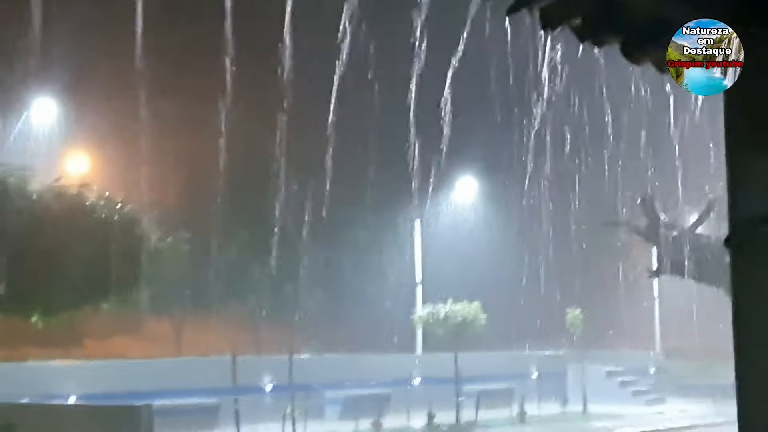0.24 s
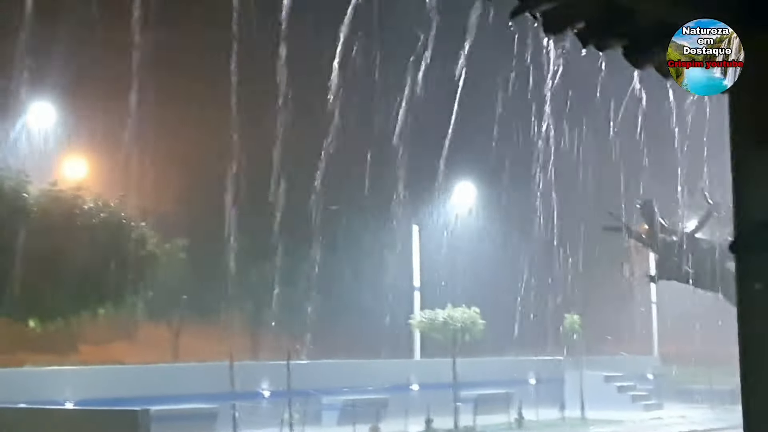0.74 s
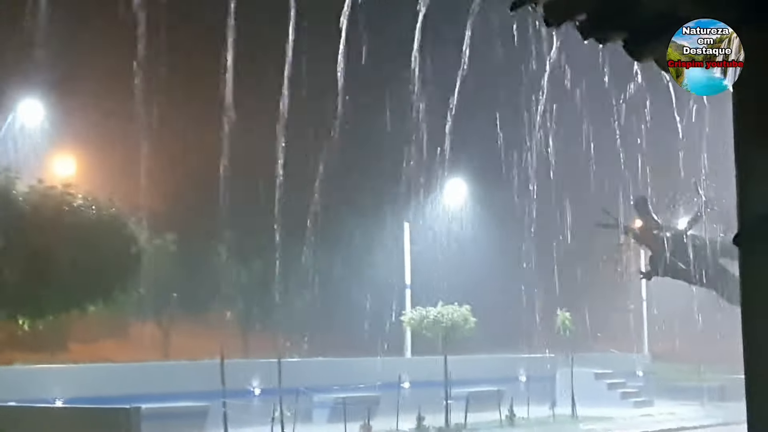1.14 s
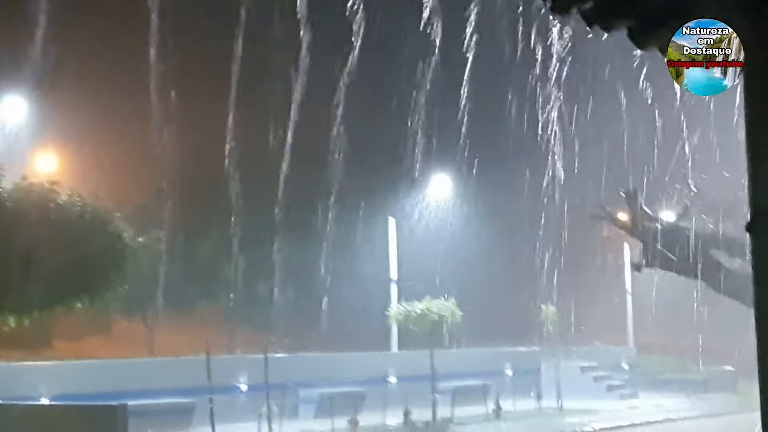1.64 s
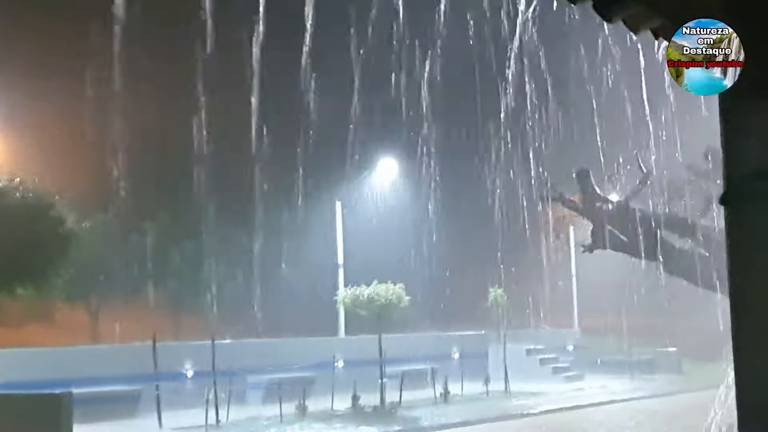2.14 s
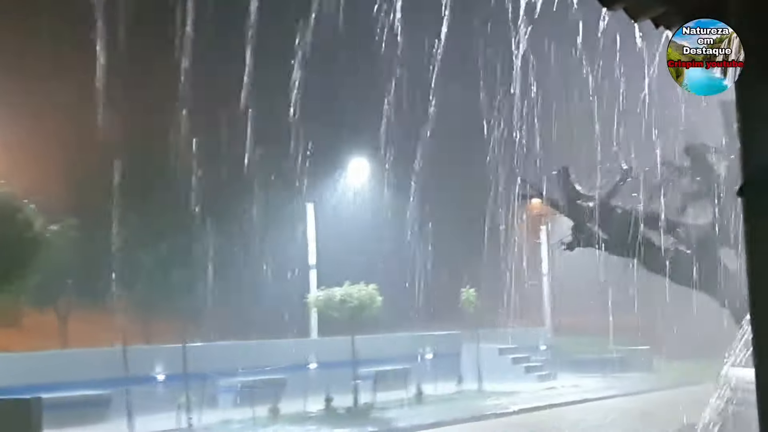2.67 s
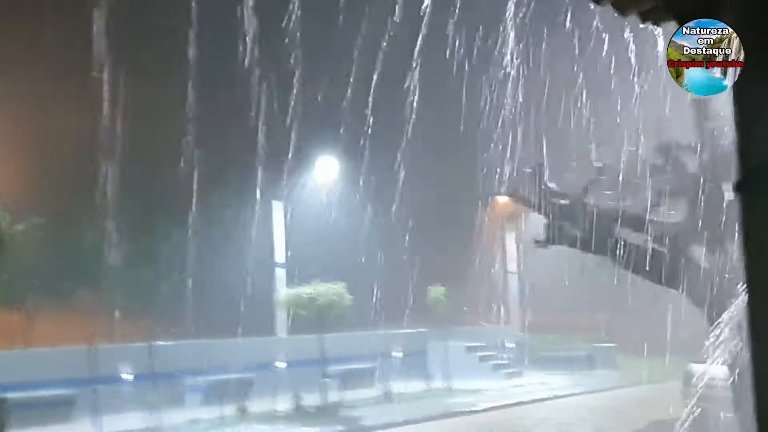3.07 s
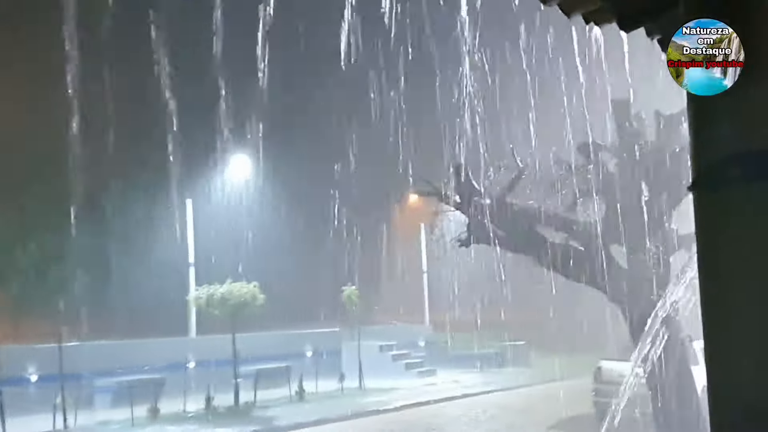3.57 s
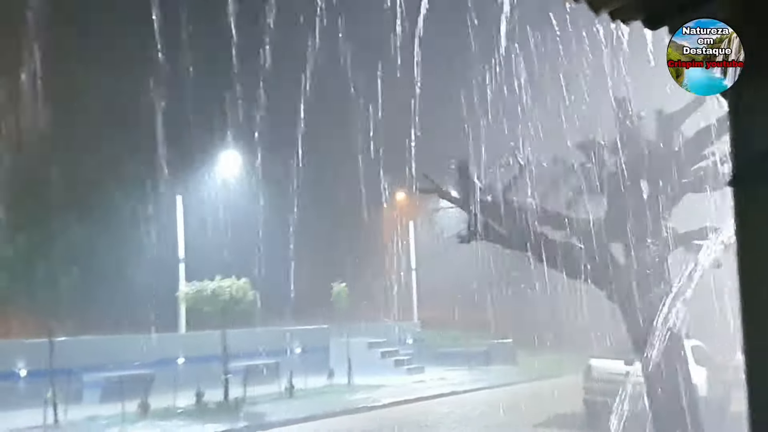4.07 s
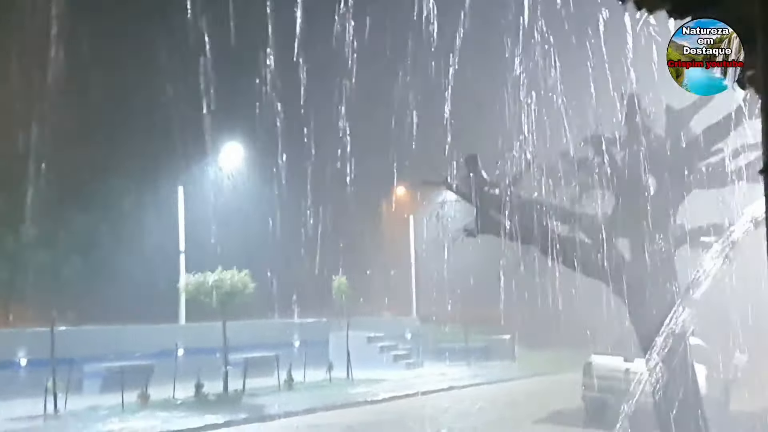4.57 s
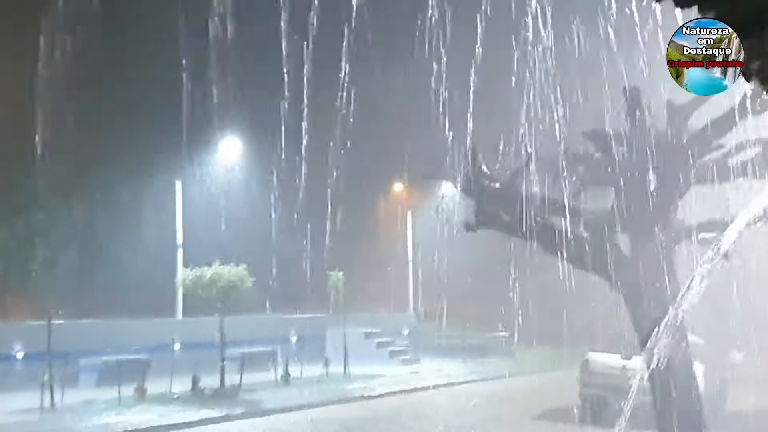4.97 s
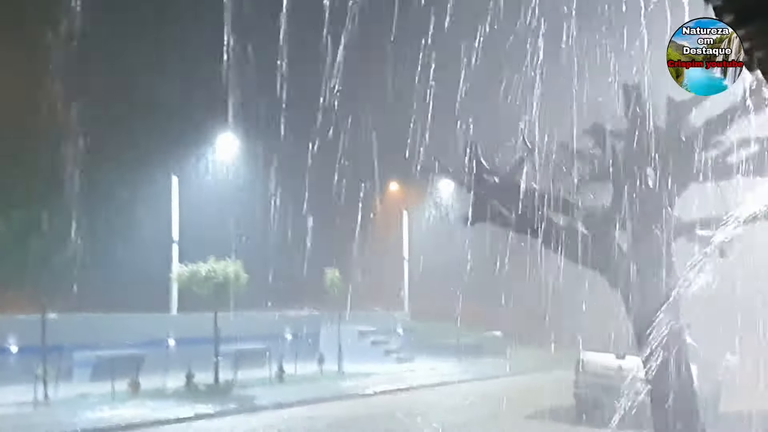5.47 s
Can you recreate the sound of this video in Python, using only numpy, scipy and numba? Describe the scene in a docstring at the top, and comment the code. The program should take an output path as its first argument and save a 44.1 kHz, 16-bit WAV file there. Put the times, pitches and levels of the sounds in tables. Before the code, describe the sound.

A torrential downpour heard from under the eaves: dense crackling run-off nearby, broad rain hiss behind, dull faint roof drumming.

```python
"""A torrential downpour from under the eaves, on a hand-held phone: strands of run-off spatter on the
paving close by, as clumped damped sines, and heavier gushes slap down as quick swarms of them.
Behind, far drops merge into a hiss of flickering noise and the roof drums dully in low noise.
Single drops tick beside the phone, plop into puddles or leave ringing bubbles; something hollow rings
as a few wavering sines. A squall lifts the rain, the run-off grows, and both ease off near the end."""
import sys
import numpy as np
from scipy import signal
from scipy.fft import rfft, irfft
from scipy.io import wavfile
from numba import njit

SR = 44100
rng = np.random.default_rng(int(sys.argv[2]) if len(sys.argv) > 2 else 0)


def dump(signal):
    """Clip the signal to [-1, 1] and save it as 16-bit WAV at the path in sys.argv[1]."""
    limited = np.clip(np.atleast_2d(signal).T, -1, 1)
    pcm = np.round(limited * 32767).astype(np.int16)
    wavfile.write(sys.argv[1], SR, pcm)


N = 252252
T = np.arange(N) / SR
BINS_HZ = np.maximum(np.arange(N // 2 + 1) * SR / N, 1)
PORT_LAG_S = 0.00041  # travel time of sound from one microphone port to the other


def undb(db):
    """Decibels to gain."""
    return 10 ** (np.asarray(db) / 20)


def unit(x):
    """Scale to an rms of 1."""
    return x / np.sqrt(np.mean(x ** 2))


def colour(x, points):
    """Filter by a (f/Hz, level/dB) table, interpolated over log frequency."""
    hz, db = np.transpose(points)
    gain = undb(np.interp(np.log(BINS_HZ), np.log(hz), db))
    return irfft(rfft(x) * gain, N)


def walk(rate):
    """Smooth chance that turns about rate times a second; spread near 1."""
    return 1.34 * np.interp(T * rate, np.arange(2048), rng.standard_normal(2048))


def ramp(start_s, length_s):
    """Rises from 0 to 1 and stays there."""
    return np.clip((T - start_s) / length_s, 0, 1)


def weather():
    """Relative gains of open rain and run-off: a squall lifts the rain, which relaxes as the roof fills."""
    squall_s, attack_s, release_s = 0.45, 0.15, 1.47
    rain_db, squall_db = -28.5, 2  # steady level, and what the squall adds
    runoff_db, swell_db, swell_db_per_s = -30, 1.5, 0.49  # level at first, its step, its further growth
    squall = ramp(squall_s, attack_s)
    since = np.maximum(T - squall_s, 0)
    lull = -1.5 * ramp(5.34, 0.055)  # both ease off
    rain = rain_db + squall_db * squall * np.exp(-since / release_s)
    flow = runoff_db + swell_db * squall + swell_db_per_s * since
    return undb(rain + lull), undb(flow + lull)


def dips():
    """Gain of the moments when the level dips briefly."""
    # brief dips: (t/s, depth/dB, half-length/s)
    dip_rows = [(3.63, -2.5, 0.018), (5.39, -4.5, 0.013)]
    return undb(sum(db * np.exp(-((T - s) / half_s) ** 2) for s, db, half_s in dip_rows))


def diffuse():
    """Noise from all around: alike at both ports only for waves longer than their spacing."""
    mid, side = rfft(rng.standard_normal((2, N)))
    alike = .9 * np.sinc(2 * BINS_HZ * PORT_LAG_S)
    mid, side = mid * np.sqrt(1 + alike), side * np.sqrt(1 - alike)
    return irfft(np.array([mid + side, mid - side]), N)


def roof_drumming():
    """Rain on the roof above drums dully: low noise whose level wanders."""
    # spectrum of the drumming: (f/Hz, level/dB per Hz, relative)
    drumming = [(25, -18), (45, -5), (70, 4.5), (100, 10), (140, 3.5), (180, -8), (300, -39), (600, -18)]
    return undb(-43.5) * unit(colour(diffuse(), drumming)) * undb(1.0 * walk(7.05))


def open_rain(swell_db, flicker_db):
    """Far drops merge into a hiss whose octaves swell together and flicker alone."""
    # spectrum of the hiss: (f/Hz, level/dB per Hz, relative)
    hiss = [(120, -1.5), (250, -2), (450, -4.5), (900, -1), (1500, 1.5), (2400, 3), (5500, 0), (8000, -3),
            (12000, -2), (16000, 3)]
    spectrum, swell, out = rfft(colour(diffuse(), hiss)), walk(22.01), 0
    octave = np.clip(np.log2(BINS_HZ / 125), 0, 7)
    for k in range(8):
        share = np.maximum(1 - abs(octave - k), 0)  # neighbouring octaves crossfade
        band = irfft(spectrum * share, N)
        out = out + band * undb(swell_db * swell + flicker_db * walk(35))
    return unit(out)


def hollow_rings(rise_s, fall_s, waver_db, wobble):
    """Water playing on something hollow, perhaps a pipe, sounds a few wavering resonances."""
    # rings that swell and fade: (peak t/s, rms level at the peak/dB before waver and pan, f/Hz)
    ring_rows = [(0.125, -42, 1150), (1.215, -33.8, 672), (1.235, -43.5, 780), (4.45, -45, 690)]
    out = 0
    for s, db, hz in ring_rows:
        swell = np.exp(np.minimum((T - s) / rise_s, (s - T) / fall_s))
        phase = 2 * np.pi * hz * T + wobble * walk(150)
        out = out + undb(db + waver_db * walk(90)) * swell * np.sqrt(2) * np.sin(phase)
    return out * undb([[1.5], [-1.5]])  # a little to the left


@njit
def pings(start, hz, q, size):
    """Sum of damped sines, each ringing for about q cycles."""
    out = np.zeros(N)
    for k in range(len(start)):
        first = int(np.ceil(start[k] * SR))
        pole = (2j - 1 / q[k]) * np.pi * hz[k] / SR
        z = size[k] * np.exp(pole * (first - start[k] * SR))  # starts between samples
        step = np.exp(pole)
        for i in range(first, min(N, first + int(2 * q[k] * SR / hz[k]) + 2)):
            if i >= 0:
                out[i] += z.imag
            z *= step
    return out


def drops(start, hz, q, size, pan_db, spread=1, echo_db=-7, echo_s=.0035):
    """Impacts from random directions: each has its own lag between the ports and its own echo off the wall."""
    strand_share, strand_bearing = .12, 0.83  # share under one thick strand; sine of its angle to the left
    bearing, echo_bearing, flip, path, place = rng.uniform(-1, 1, (len(start), 5)).T
    bearing = np.where(abs(place) < strand_share, strand_bearing, bearing)
    hz, q = np.clip(hz, 200, .4 * SR), np.full(len(start), max(q, .5))
    size = size * np.sign(flip)  # random polarity
    echo = start + echo_s * (1 + .8 * path)
    ports = []
    for ear in (1, -1):  # left, right
        direct_s = start - ear * spread * bearing * PORT_LAG_S / 2
        echoed_s = echo - ear * echo_bearing * PORT_LAG_S / 2
        direct = pings(direct_s, hz, q, size * undb(ear * pan_db / 2))
        ports.append(direct + pings(echoed_s, hz, q, size * undb(echo_db)))
    return np.array(ports)


def spatter(count, hz, octaves, q, scatter_db, clump_db, clump_rate):
    """Strands of water break into drops that land in clumps; most are small, a few are big."""
    when, rank = rng.random((count, 2)).T
    pitch, pan = rng.standard_normal((count, 2)).T
    start = when * T[-1]
    clump = np.interp(start, T, np.clip(walk(clump_rate), -2, 2))
    bigness = -np.log(rank + .008)
    size = undb(scatter_db * bigness + clump_db * clump)
    return unit(drops(start, hz * 2 ** (octaves * pitch), q, size, 4 * pan))


def puddle_patter():
    """Many low-pitched drops patter faintly in the puddles."""
    return undb(-46.5) * spatter(count=1100, hz=1116, octaves=0.57, q=2.6,
                                 scatter_db=2.0, clump_db=1.0, clump_rate=27)


def single_drops(rows, q, pan_db):
    """Drops almost straight ahead, so close that their echo hardly counts."""
    s, db, hz = np.array(rows, float).T
    return drops(s + .001, hz, q, undb(db), pan_db, spread=.1, echo_db=-16, echo_s=.003)


def puddle_plops():
    """Fat drops fall into puddles with a short low ring."""
    # plops: (t/s, relative level/dB, f/Hz)
    plop_rows = [(1.051, -24.5, 945), (4.39, -23, 1340), (4.537, -26.5, 899), (4.889, -26, 1430)]
    return undb(6) * single_drops(plop_rows, q=6, pan_db=2.2)


def bubble_plinks():
    """Large bubbles ring out for many cycles."""
    # ringing bubbles: (t/s, relative level/dB, f/Hz)
    plink_rows = [(.478, -20.5, 2580), (.888, -19.5, 2340), (.938, -17, 2300), (2.16, -21, 2250)]
    return undb(-2) * single_drops(plink_rows, q=45, pan_db=-1)


def loose_times(count):
    """One moment at random in each of count equal stretches."""
    return (np.arange(count) + rng.random(count)) * T[-1] / count


def hard_ticks(stray_count):
    """The hardest drops, right beside the phone, and some weaker strays tick near one pitch."""
    # hardest drops: (t/s, relative level/dB)
    hardest = [(0.7622, -8), (2.7162, -9), (3.7389, -7), (5.1786, -8), (5.3797, -8), (5.6431, -7.5)]
    tick_hz, stray_db = 5600, -12  # common pitch; relative level of the strays
    rows = list(hardest) + [(s, stray_db) for s in loose_times(stray_count)]
    rows = np.column_stack([rows, tick_hz * (1 + .06 * rng.standard_normal(len(rows)))])
    return undb(-2) * single_drops(rows, q=4.5, pan_db=-7)


def light_gushes(count):
    """Rows of (t/s, strength/dB, nominal f/Hz) for small lumps that keep breaking off the roof edge."""
    mean_db, scatter_db, nominal_hz, octaves = 0, 2, 3700, .35
    size, pitch = np.clip(rng.standard_normal((count, 2)), -1.5, 1.5).T
    hz = nominal_hz * 2 ** (octaves * pitch)
    return np.transpose([loose_times(count), mean_db + scatter_db * size, hz])


def gushes(light_count, count, length_s, octaves, q, scatter_db):
    """A lump of water lands as a quick swarm of drops that builds fast and trails off."""
    # heaviest gushes on the ground: (t/s, relative strength/dB, nominal f/Hz of the splash)
    heavy = [(0.485, 4, 2340), (0.677, 5, 4000), (0.925, 2.5, 2600), (1.005, 2.5, 2760), (1.262, 2.5, 2450),
             (1.919, 7.5, 3070), (2.165, 2.5, 2150), (2.372, 5.5, 3230), (2.893, 2, 2400),
             (3.201, 3.5, 2740), (3.5, 6.5, 2450), (4.285, 1, 2600), (4.598, 5.5, 2250), (4.938, 4.5, 2050)]
    rows = np.vstack([heavy, light_gushes(light_count)])
    s, db, hz = rows.T[:, :, None]
    chance = np.clip(rng.standard_normal((len(s), count, 3)), -1.6, 1.6)
    pitch, pan, big = chance.transpose(2, 0, 1)
    late = rng.gamma(3, 1 / 3, pitch.shape) - .9
    share = undb(scatter_db * big)
    # the drops share the lump's energy
    size = undb(db) * share / np.linalg.norm(share, axis=1, keepdims=True)
    pitch_hz = 1.134 * hz * 2 ** (octaves * pitch)  # centred above the nominal pitch
    return drops((s + length_s * late).ravel(), pitch_hz.ravel(), q, size.ravel(), 3 * pan.ravel())


def runoff(rain, flow):
    """Water off the eaves hits the paving as spray, patter, bubbles, fizz and slaps."""
    # small drops radiate little bass: (f/Hz, level/dB)
    radiation = [(500, -10), (1100, -2), (2000, -0.5)]
    spray = undb(-1.5) * flow * spatter(count=14000, hz=5080, octaves=0.51, q=3.24,
                                        scatter_db=3.0, clump_db=1.5, clump_rate=70)
    patter = undb(-9.5) * flow * spatter(count=4000, hz=2600, octaves=0.25, q=2.9,
                                         scatter_db=3.0, clump_db=1.0, clump_rate=55)
    # air trapped by a drop rings for longer than the impact itself
    bubbles = undb(-8.5) * flow * spatter(count=900, hz=4100, octaves=.45, q=60,
                                          scatter_db=2.7, clump_db=1, clump_rate=15)
    # the fizz follows the open rain
    fizz = undb(-6) * rain * spatter(count=7000, hz=11400, octaves=0.32, q=2.6,
                                     scatter_db=3.0, clump_db=3.0, clump_rate=42)
    slaps = undb(-6.0) * gushes(light_count=14, count=36, length_s=.031, octaves=0.39,
                                q=4.23, scatter_db=3.0)
    return colour(spray + patter + bubbles + fizz + slaps, radiation)


def scene():
    """Open rain and roof behind; run-off, gushes and single drops in front."""
    rain, flow = weather()
    roof = roof_drumming()
    far = undb(5) * rain * open_rain(swell_db=.5, flicker_db=1.31)
    rings = hollow_rings(rise_s=.027, fall_s=.08, waver_db=2.5, wobble=.6)
    puddles = puddle_patter() + puddle_plops() + bubble_plinks()
    ticks = hard_ticks(stray_count=10)
    near = runoff(rain, flow)
    # the dips leave roof, rings and ticks alone
    return roof + rings + ticks + dips() * (far + puddles + near)


def record(dry):
    """Each port has its own cavity resonances; the phone cuts the deep bass and the top."""
    # colour of the two microphone ports: (f/Hz, left level/dB, right level/dB)
    ports = np.array([(100, -7.5, -6.5), (300, -2.5, -4.5), (1450, -2, -4), (2480, 0, 3), (3240, 2.5, 1.5),
                      (4590, 1.5, 6), (5600, 4, 11), (6250, 1.5, 7.5), (7180, 2, -3), (7340, -8, -4.5),
                      (9430, -2, -3), (10360, -3.5, 3.5), (12140, -0.5, 9), (15600, -5, -1)])
    bass_hz, top_hz = 55, 15750
    heard = np.array([colour(dry[ear], ports[:, [0, ear + 1]]) for ear in (0, 1)])
    heard = signal.sosfilt(signal.butter(3, bass_hz, "high", fs=SR, output="sos"), heard)
    return signal.sosfilt(signal.ellip(12, .2, 80, top_hz, fs=SR, output="sos"), heard)


dry = scene()
out = record(dry)
dump(out)
```